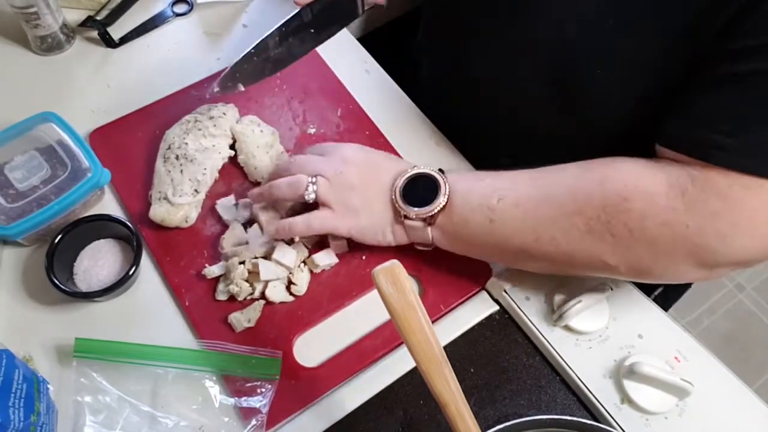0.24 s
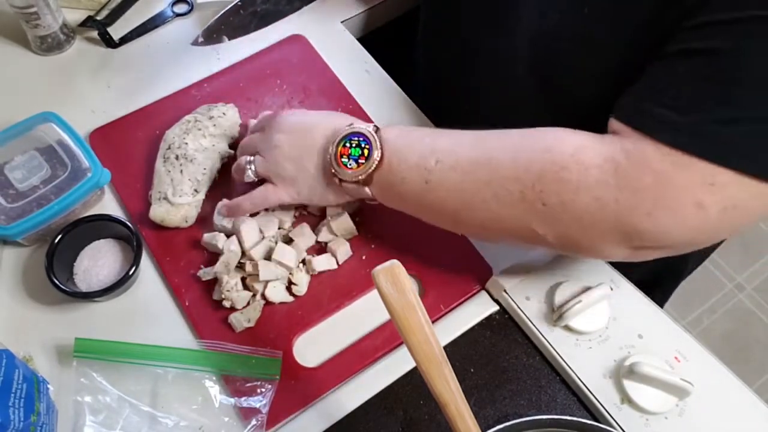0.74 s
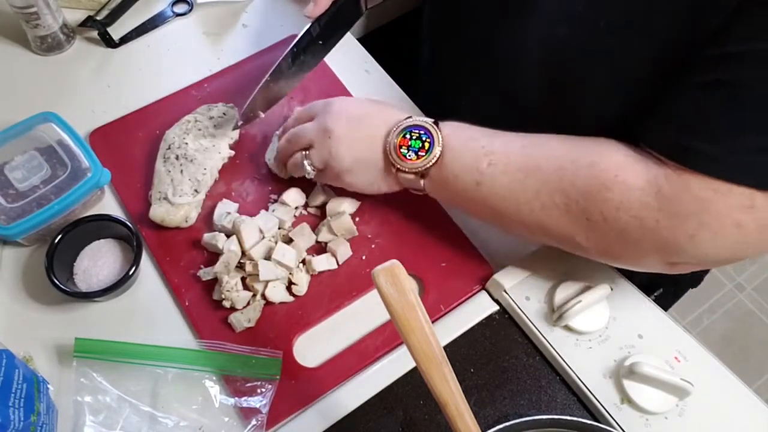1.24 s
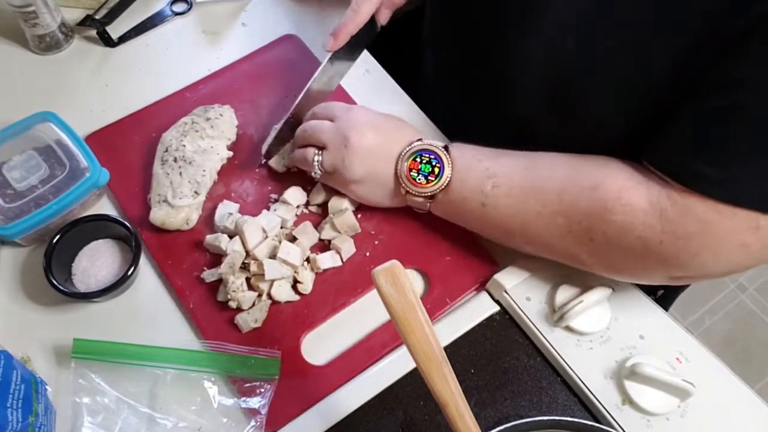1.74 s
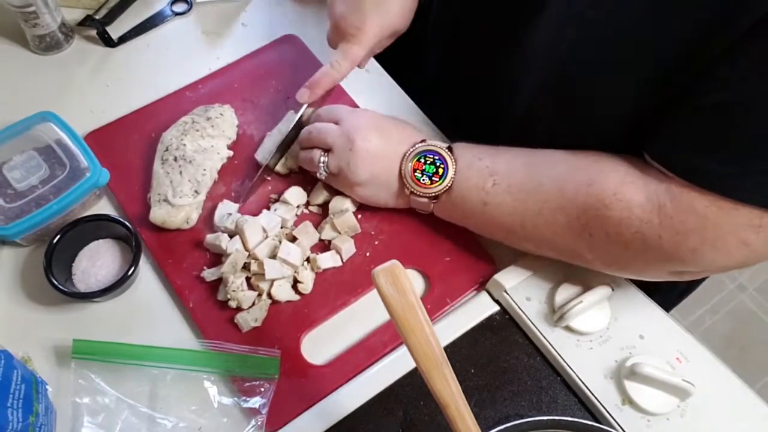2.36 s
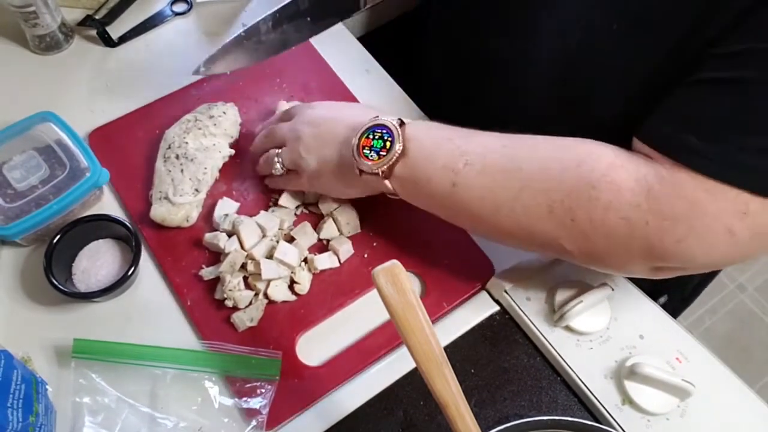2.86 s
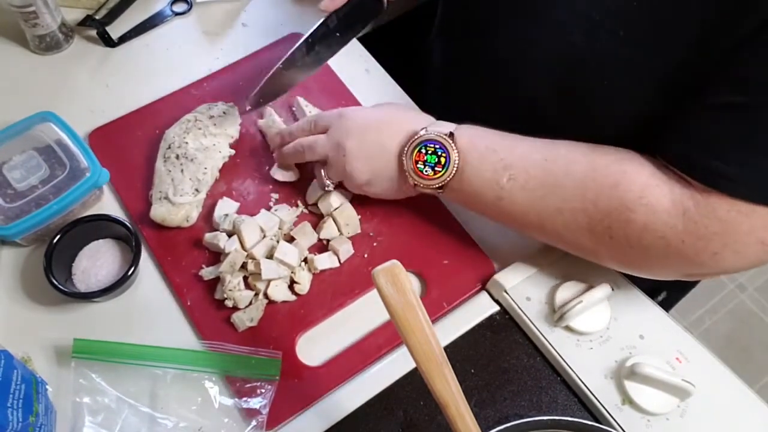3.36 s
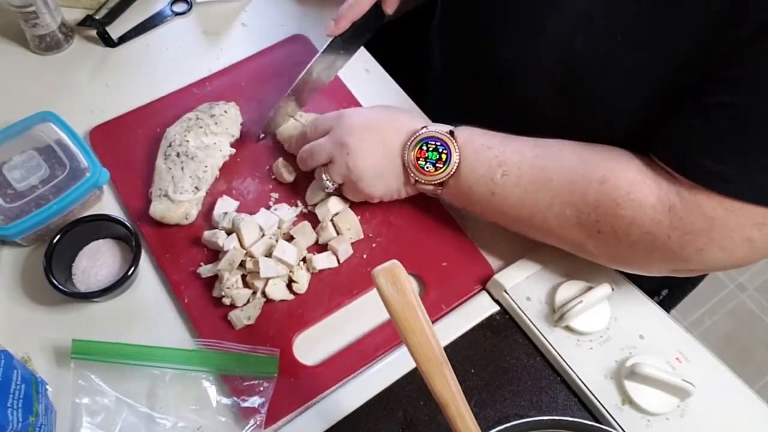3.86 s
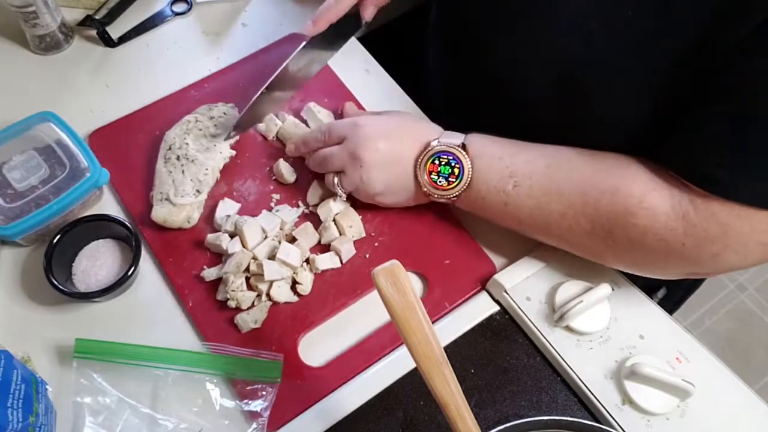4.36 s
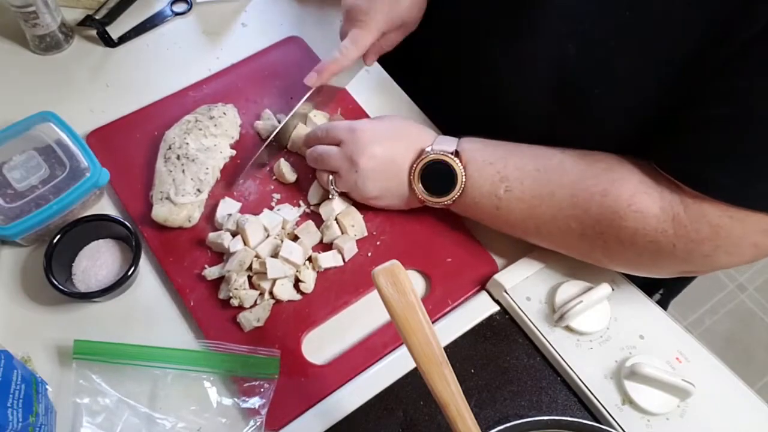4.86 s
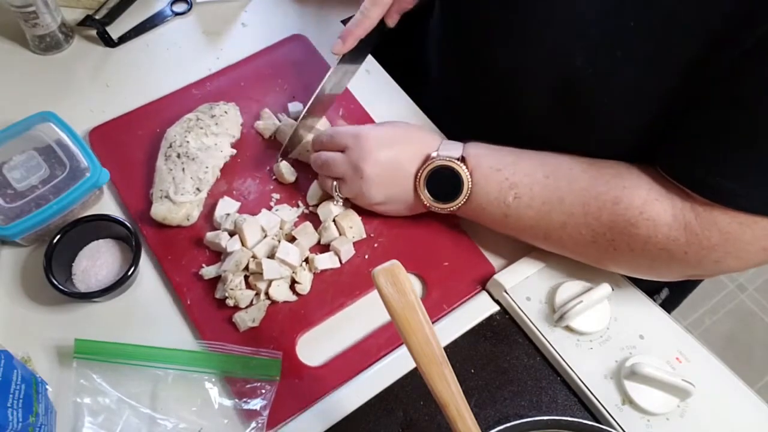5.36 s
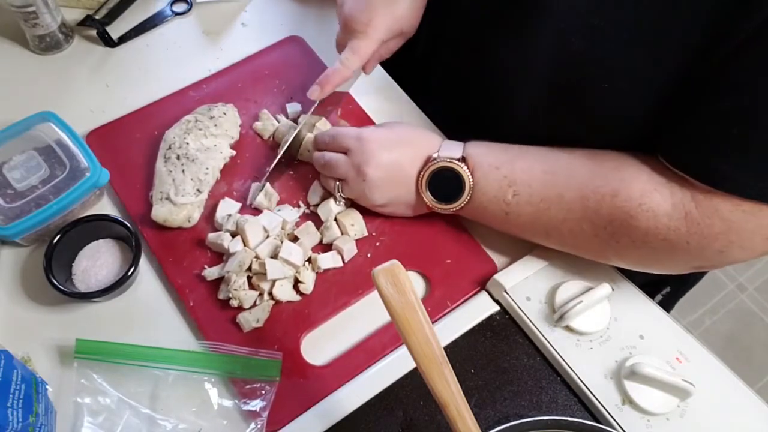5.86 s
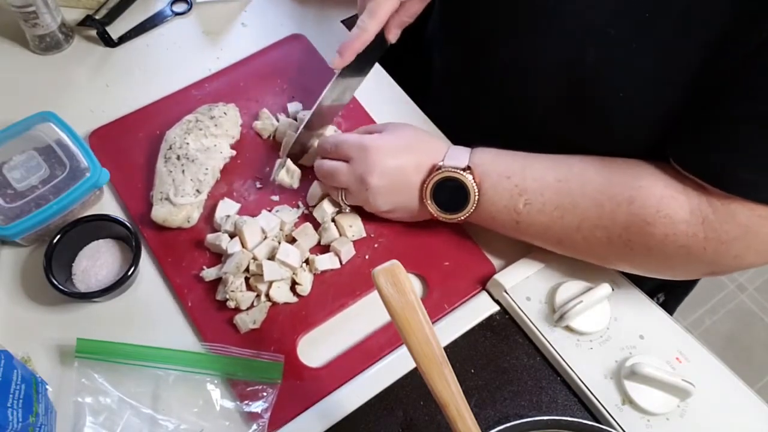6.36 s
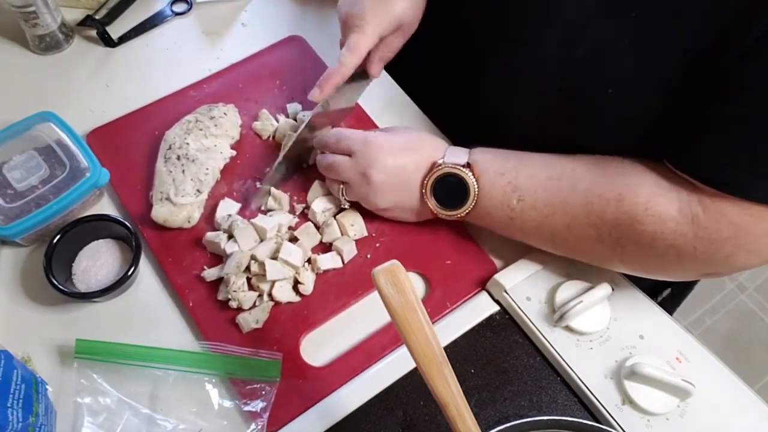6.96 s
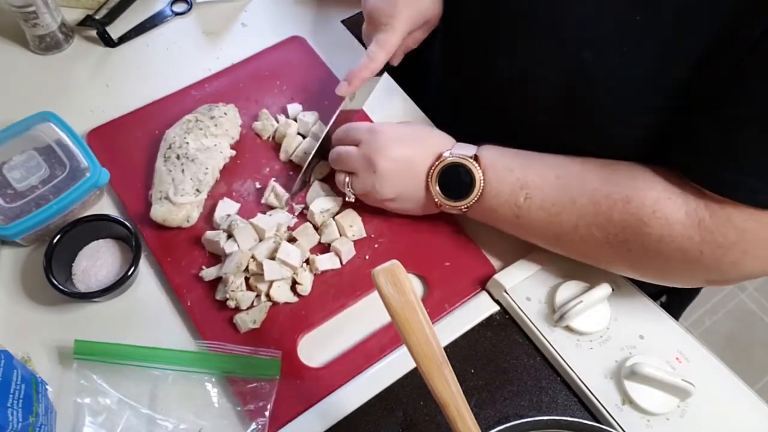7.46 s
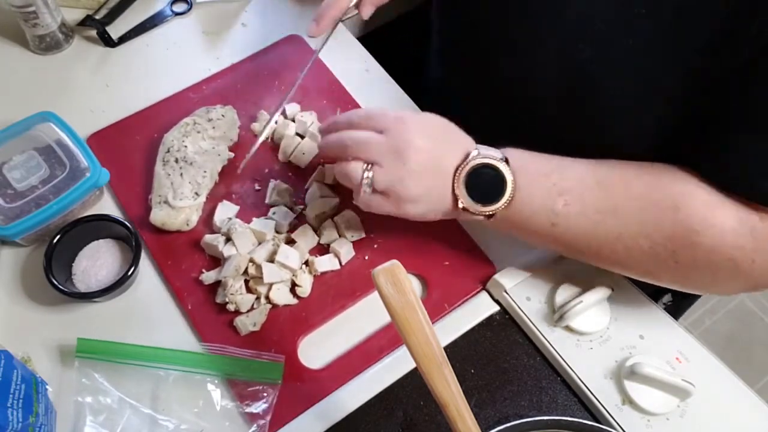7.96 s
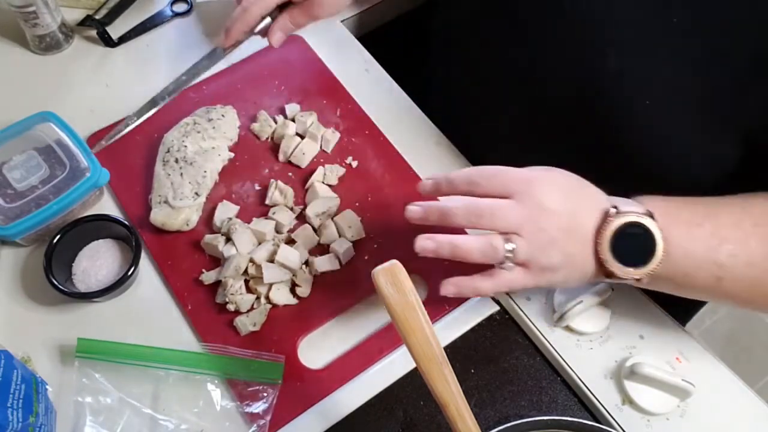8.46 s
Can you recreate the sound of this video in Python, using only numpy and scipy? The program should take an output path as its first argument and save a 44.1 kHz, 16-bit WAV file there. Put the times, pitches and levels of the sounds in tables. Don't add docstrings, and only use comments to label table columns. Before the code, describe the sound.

Close in a small hard kitchen, hands quietly shift moist cooked chicken, then a knife knocks irregularly on a plastic board. Three or four blows are sharp, loud and boomy, others mere dull taps, each with a brief rattle. Soft thuds, wipes and wet ticks fill the gaps. A fridge hums faintly and crickets chirp very softly outside. At the end the knife skids and clanks down. Stereo microphone just above the board.

```python
import sys
import numpy as np
from scipy import signal
from scipy.fft import rfft, irfft
from scipy.io import wavfile
from scipy.ndimage import uniform_filter1d

SR = 44100
rng = np.random.default_rng(int(sys.argv[2]) if len(sys.argv) > 2 else 0)


def materialize(psi):
    bounded = np.clip(np.atleast_2d(psi).T, -1, 1)
    quanta = np.round(bounded * 32767).astype(np.int16)
    wavfile.write(sys.argv[1], SR, quanta)


def ratio(d):
    e = np.asarray(d, float) / 20
    return 10 ** e


N = 384111

# (t/s, clack peak/dB, board boom/dB, edge crack below the clack/dB, clack f/Hz)
CHOPS = [(1.6819, -31.5, -37, -24.5, 1185), (1.8317, -35, -47, -42, 1180), (2.2044, -10, -26, -26, 1316),
         (2.3054, -37.5, -42, -22, 1230), (2.671, -40, -45, -20, 1327), (3.8381, -42.5, -74.5, -6, 1290),
         (3.9643, -5, -21, -6.5, 1300), (4.0116, -18, -29.5, -17, 1400), (4.5861, -35, -45, -33, 1306),
         (4.6932, -10, -27, -19.5, 1350), (4.8568, -28, -50.5, -15.5, 1320),
         (5.4697, -31, -38, -23.5, 1230), (5.6532, -26.5, -36.5, -35, 1170),
         (6.5899, -37.5, -43.5, -19, 1170), (7.381, -13, -27, -39, 948), (7.6067, -40, -55, -30, 1120),
         (7.6697, -48, -51, -19.5, 1113)]
# (clack rise/ms, low rattle below the clack/dB, high rattle/dB, t60/s, face ring/dB)
SETTLING = [(1.27, -17.5, -26.5, 0.32, -26), (1.4, -27, -47, .15, -13), (1, -21.5, -33, 0.25, -15.5),
            (1.5, -22, -28, .1, -24), (1.8, -11, -23, 0.19, -9), (1.2, -24, -23, .15, -13.5),
            (2.7, -24.5, -25, 0.38, -11), (0.85, -21, -17.5, 0.18, -14), (0.64, -17, -30, 0.29, -12),
            (1.2, -27.5, -30.5, 0.35, -12), (0.7, -21, -24, 0.12, -13.5), (1.06, -16.5, -31, 0.34, -19),
            (0.97, -23, -44, 0.25, -15), (2.6, -19.5, -33, 0.18, -10), (1.3, -21, -52, 0.29, -10),
            (1.1, -12.5, -33.5, 0.3, -13.5), (0.72, -21, -32, .15, -12)]
# (f/Hz, level/dB, t60/s)
BOARD = [(296.6, 1.42, 0.085), (360.5, -4.5, 0.065), (252, -10, 0.1107), (481.2, -9, 0.0559)]
# (f/Hz, level/dB, t60/s)
COUNTER = [(135, 0.5, 0.2), (156, -5.5, .1), (111.06, -19.5, 0.12), (59, -14, 0.35)]

OPPOSITE = np.array([[1], [-1]])


def sides(left_db, right_db):
    return ratio(np.array([[left_db], [right_db]]))


def on_log(table, hz, axis=1):
    table = np.array(table, float)
    return np.interp(np.log(np.maximum(hz, 1)), np.log(table[:, 0]), table[:, axis])


def gain_curve(spans):
    out = np.zeros(N)
    for rows in spans:
        s, db = np.array(rows, float).T
        i = np.arange(max(int(s[0] * SR), 0), min(int(s[-1] * SR), N))
        out[i] += ratio(np.interp(i / SR, s, db))
    return uniform_filter1d(out, size=300)


def rub(rows, peak_share=.22):
    end_db, hold_share = -15.5, 0.22
    spans = []
    for s, length, db, *share in rows:
        top = np.clip(share[0] if share else peak_share, .02, .97)
        held = top + hold_share * (1 - top)
        shape = [(0, end_db), (top, 0), (held, -2.5), (1, end_db), (1.3, 2 * end_db)]
        spans.append([(s + length * part, db + step) for part, step in shape])
    return gain_curve(spans)


def band(x, hz, width):
    return signal.lfilter(*signal.iirpeak(min(hz, SR / 2.2), hz / width, fs=SR), x)


def hiss(lo_hz, hi_hz, channels=1, length=N, order=2):
    sos = signal.butter(order, [lo_hz, min(hi_hz, SR / 2.2)], "bandpass", fs=SR, output="sos")
    x = signal.sosfilt(sos, rng.standard_normal((channels, length)))
    return x / np.sqrt(np.mean(x ** 2))


def walk(rate):
    k = int(SR / rate)
    steps = np.repeat(rng.standard_normal(N // k + 1), k)
    return uniform_filter1d(uniform_filter1d(steps, k), k)[:N]


def ring(modes, rise_s, scatter_db=2.5, detune=.018, length=16000):
    t, out = np.arange(length) / SR, 0
    chance = rng.standard_normal((len(modes), 2))
    for (hz, db, t60), (weight, shift) in zip(modes, chance):
        tone = np.sin(2 * np.pi * hz * (1 + detune * shift) * t)
        out = out + ratio(db + scatter_db * weight) * tone * ratio(-60 * t / t60)
    return out * (1 - np.exp(-t / rise_s))


def add(track, sound, s):
    i = int(s * SR)
    track[i:i + len(sound)] += sound[:N - i]


def chops():
    # (f/Hz, width/Hz, level/dB)
    face_modes = [(720, 35, -4.5), (870, 50, 0), (1045, 28, -1.5), (1200, 40, -3), (1382, 40, 0.5),
                  (1586, 50, 0), (1900, 50, 0.5), (2320, 35, 0.5), (2690, 65, 0)]
    out, t = np.zeros(N), np.arange(16000) / SR
    n = len(t)
    for (s, db, board_db, edge_db, hz), (rise_ms, *_, face_db) in zip(CHOPS, SETTLING):
        age = t / (rise_ms / 1000)
        clack = -np.sin(2 * np.pi * hz * t) * age ** 2 * np.exp(1 - age ** 2)
        face = 0
        for k, (f, width, up_db) in enumerate(face_modes):
            face = face + (-1) ** k * ratio(up_db) * band(clack, f, width)
        face = face / np.abs(face).max()

        square_db = edge_db + 21
        slap_db = -17 + 0.34 * square_db
        dull_db = board_db - 2.5 - 0.28 * max(square_db + 5, 0)
        swell = (1 - np.exp(-t / 0.0027)) * np.exp(-t / 0.0073)
        dull = hiss(430, 900, length=n)[0] * swell
        bright = hiss(1000, 2000, length=n)[0] * swell

        crack = hiss(1800, 3500, length=n)[0] + 0.22 * hiss(4000, 7200, length=n)[0]
        crack = crack + .012 * hiss(8000, 15500, length=n)[0]
        crack = crack * (1.1 * np.exp(-t / 0.0013) + 0.1 * np.exp(-t / 0.023))

        counter_db = -43 + 0.51 * (board_db + 40)
        boom = ratio(board_db + 7.5) * ring(BOARD, 0.0029, 3.1)
        boom = boom + ratio(counter_db + 5) * ring(COUNTER, .005, 0.79)
        edge = clack + ratio(face_db) * face + ratio(slap_db) * bright + ratio(edge_db) * crack
        add(out, ratio(db + 1.0) * edge + ratio(dull_db + 6.5) * dull + boom, s + 0.001)
    return out


def settling():
    # (f/Hz, width/Hz, level/dB)
    rattle_peaks = [(2070, 130, 4), (2800, 170, 0), (3240, 100, 0)]
    out, t = np.zeros((N, 2)), np.arange(16000) / SR
    n = len(t)
    for (s, db, *_), (_, low_db, high_db, t60, _) in zip(CHOPS, SETTLING):
        uneven = ratio(4.5 * walk(140)[:n] - 60 * t / t60) * (1 - np.exp(-t / .003))
        low = hiss(480, 1250, channels=2, length=n)
        high = hiss(1600, 2700, channels=2, length=n)
        top = hiss(4100, 6100, channels=2, length=n)
        flexing = sum(ratio(up_db) * band(high, hz, width) for hz, width, up_db in rattle_peaks)
        high = 0.51 * high + flexing + ratio(-16.5) * top
        rattle = ratio(low_db) * low + ratio(high_db) * high
        add(out, (ratio(db) * uneven * rattle).T, s + .002)
    return out.T * sides(1.8, -1.8)


def flexes():
    # (t/s, level/dB, f/Hz, t60/s)
    bends = [(1.684, -45.5, 740, 0.094), (1.686, -38, 400, 0.066), (2.1, -51.5, 400, .05),
             (1.69, -41, 190, .1), (4.696, -36, 495, 0.066), (7.384, -33, 520, 0.097), (6.1, -50, 417, .05),
             (2.42, -48.5, 57, 0.46), (5.47, -49, 170, .12), (6.591, -29, 200, .11),
             (6.71, -48, 170, 0.091), (7.384, -30, 187, 0.077), (7.7, -47, 56, .5), (7.741, -55, 56, .3),
             (8.56, -43.5, 61.7, 0.67)]
    out, t = np.zeros(N), np.arange(16000) / SR
    for s, db, hz, t60 in bends:
        rise = 1 - np.exp(-t * hz * 0.76)
        add(out, ratio(db - 60 * t / t60) * np.sin(2 * np.pi * hz * t) * rise, s)
    return out


def blade_ringing():
    # (f/Hz, level/dB, t60/s)
    blade = [(5330, -13, .08), (6290, 0, .13), (7420, -2, .07), (11800, -6, .06), (13000, -9, .07),
             (14350, -4, .04)]
    # (t/s, level/dB)
    taps = [
        (2.648, -59),
        (2.657, -58),
        (2.668, -53),
    ]
    # (start/s, length/s, level/dB)
    squeaks = [
        (2.954, .04, -74),
        (3.384, 0.061, -73),
    ]
    out, t = np.zeros(N), np.arange(N) / SR
    held = [(f, d, min(t60, .1)) for f, d, t60 in blade]
    for s, db in taps:
        add(out, ratio(db) * ring(held, 0.0046, scatter_db=-3.0, detune=0.00079), s)
    add(out, ratio(-57) * ring([(6430, 0, .02)], 0.0016, detune=.001), 2.787)
    for s, length, db in squeaks:
        swell = np.exp(-((t - s - length / 2) / (length / 2)) ** 2)
        out += ratio(db) * np.sin(2 * np.pi * 14250 * t) * swell
    return out


def laying_down():
    # (f/Hz, level/dB, t60/s)
    knife_modes = [(358, -15.5, 0.14), (599, -18.5, 0.085), (851, -11, .3), (953, -14.5, 0.17),
                   (1412, -12, 0.13), (1637, 4.5, 0.079), (1700, -2.5, 0.079), (2140, -13.5, 0.13),
                   (2250, -13, 0.071), (2806, -10, 0.048), (3620, -16, 0.054), (4650, -29, 0.09)]
    # (start/s, length/s, level/dB, share before the peak)
    slide = [
        (8.522, 0.057, -63, 0.12),
        (8.566, 0.053, -59, 0.36),
    ]
    land_s, land_db = 8.6195, -29.5
    out = np.zeros(N)
    steel = [(f, d, min(t60, .25)) for f, d, t60 in knife_modes]
    # (lag/s, level/dB)
    for lag_s, db in [(-.001, 1), (.007, -17), (.017, -18), (.03, -23), (.052, -21)]:
        add(out, ratio(land_db + db) * ring(steel, 0.0031, scatter_db=2.0, detune=0.011), land_s + lag_s)
    grit = rng.standard_normal(N) * ratio(3.9 * walk(150))
    skid = sum(band(grit, f, 130) for f, _, _ in knife_modes if 1600 < f < 3000)
    out += skid / np.std(skid) * rub(slide)
    t = np.arange(4000) / SR
    add(out, ratio(land_db - 14.0) * hiss(620, 1950, length=4000)[0] * np.exp(-t / 0.029), land_s)
    return out


def thuds():
    # (t/s, peak/dB, board boom/dB, mids/dB)
    pushes = [(0.2, -53.5, -65, -75), (.756, -58, -58, -75), (.79, -60, -58, -75), (.83, -62.5, -62, -75),
              (7.277, -62, -60, -62), (2.03, -61, -63, -75), (4.2, -56.5, -60, -75),
              (8.1, -62.5, -66, -77.5), (0.644, -44.5, -50.5, -54), (1.2, -57, -63, -82),
              (1.285, -65, -62, -80), (1.555, -50, -56, -73), (1.723, -46, -56, -70),
              (1.747, -58, -59, -72), (1.85, -50, -65, -72), (2.367, -53, -58, -65), (2.627, -40, -47, -52),
              (2.643, -49, -56, -61), (3.228, -54.5, -58.5, -76.5), (3.337, -57.5, -62, -78),
              (3.527, -57.5, -63.5, -76.5), (3.665, -56, -66, -77.5), (4.483, -56.5, -60, -69),
              (4.505, -51, -57, -69.5), (4.641, -50.5, -52, -72), (4.542, -57, -63, -70),
              (5.166, -47.5, -45, -50.5), (5.218, -46, -43.5, -59.5), (5.25, -38.5, -42.5, -52),
              (5.285, -48, -49.5, -46.5), (5.533, -44, -54.5, -68.5), (5.609, -53, -55, -49),
              (5.63, -54.5, -57.5, -55), (6.029, -59, -55, -71), (6.36, -58, -60.5, -69.5),
              (6.535, -57.5, -53.5, -72), (6.561, -57.5, -47, -64), (6.59, -40.5, -41.5, -64),
              (6.65, -45, -50.5, -50), (6.72, -52, -64, -66), (6.872, -62.5, -59, -63.5),
              (7.331, -56, -47, -75.5), (7.385, -31.5, -60.5, -71), (7.622, -47, -41, -64.5),
              (7.667, -40, -51.5, -61.5), (7.7, -49.5, -58, -72), (8.574, -57, -58, -69),
              (8.585, -47.5, -63, -65), (8.62, -49, -56, -70)]
    out, t = np.zeros(N), np.arange(16000) / SR
    for s, db, board_db, mids_db in pushes:
        pat = hiss(1180, 1480, length=len(t), order=3)[0] * np.exp(-t / .008) * np.minimum(t / .002, 1)
        low = ratio(db + 4) * ring(COUNTER, 0.0011) + ratio(board_db + 9.5) * ring(BOARD, 0.017)
        add(out, low + ratio(mids_db - 5.0) * pat, s)
    return out


def strokes():
    # (start/s, length/s, hiss level/dB, fineness/dB)
    wipes = [(0.095, 0.17, -74, -17), (0.365, 0.06, -79, -8), (0.519, 0.11, -75, -2),
             (.69, 0.24, -79.5, -28.5), (1.502, 0.083, -74, 3.5), (2.055, 0.18, -80, -3),
             (2.176, 0.15, -56.5, -0.5), (2.375, 0.23, -77, 2), (2.616, 0.13, -72, 0),
             (2.945, 0.23, -67, -5), (3.365, 0.14, -74, -7.5), (3.567, 0.055, -66.5, -10),
             (3.712, 0.069, -78, -16), (3.826, 0.084, -64, 0.5), (3.963, 0.18, -67, -5.5),
             (4.727, 0.13, -60, -8), (5.611, 0.2, -67, -2), (6.562, 0.19, -67.5, -3),
             (5.85, .15, -79.5, -8), (6.134, 0.11, -83.5, -10), (6.86, 0.078, -77.5, 3.5),
             (7.091, 0.12, -65, -20), (7.36, 0.11, -65, -7.5), (8.377, .1, -82.5, 8),
             (8.53, 0.25, -72.5, -11.5)]
    rest_db = -84
    slips = rng.random(N) < 60 / SR
    grain = ratio(2 * walk(40) + 2.5 * walk(150)) + 1.2 * signal.lfilter([1], [1, -.985], slips)

    def layer(db, per_db):
        return rub([(s, length, level + db + per_db * fineness) for s, length, level, fineness in wipes])

    fine = hiss(8900, 18000, channels=2) * (layer(0, 1) + ratio(rest_db + 1.5)) * sides(1.5, 3.5)
    middle_gain = layer(0, 0) + ratio(rest_db - 2.5 + 4.3 * walk(4.9))
    middle = hiss(3800, 8660, channels=2) * middle_gain * ratio(3.5)
    coarse = hiss(2200, 3400, channels=2) * (layer(-12.5, -.5) + ratio(rest_db)) * ratio(-3.5)
    return (fine + middle + coarse) * grain


def scuffs():
    # (start/s, length/s, low scuff/dB, brightness/dB, share of length before the peak)
    rubs = [(2.176, 0.033, -50, -25, 0.86), (2.33, 0.38, -68.5, -23, 0.11), (3.898, 0.064, -68.5, -19, .9),
            (4.665, 0.057, -55, -26, 0.96), (2.963, 0.27, -71.5, -7, 0.18), (5.15, 0.15, -64.5, -10.5, .15),
            (5.588, 0.1, -59, -21.5, 0.67), (5.683, 0.25, -63.5, -12.5, 0.33),
            (6.523, 0.078, -61.5, -17, 0.79), (6.588, 0.17, -56, -9, 0.31), (7.091, 0.19, -59, -9.5, 0.25),
            (7.348, 0.036, -54, -27, 0.94), (7.601, 0.12, -63, -15.5, 0.086), (8.516, 0.062, -70, -5, .3),
            (8.565, 0.074, -57, -14, 1)]
    low_gain = rub([(s, n, db, top) for s, n, db, _, top in rubs])
    bright_gain = rub([(s, n, db + up, top) for s, n, db, up, top in rubs])
    low = hiss(550, 1750, channels=2, order=3) * low_gain * ratio(4 * walk(80))
    bright = hiss(1900, 4200, channels=2, order=3) * bright_gain * ratio(4 * walk(120))
    return (low + bright) * sides(1.5, -1.5)


def dragged_heap():
    # (f/Hz, width/Hz, level/dB)
    hollows = [(1180, 120, 5.5), (1370, 130, 11.5), (1560, 140, 8), (2500, 240, -4.5), (2900, 350, -3),
               (5380, 710, -10)]
    noise = rng.standard_normal(N)
    drag = sum(ratio(db) * band(band(noise, f, w), f, w) for f, w, db in hollows)
    gain = rub([(0.6705, 0.18, -53.5)], 0.3)
    return drag / np.std(drag) * gain * ratio(2.6 * walk(91.2)) * sides(2.5, -.5)


def ticks():
    # (t/s, peak/dB, f/Hz)
    clicks = [(0.129, -70, 4630), (0.24, -57, 4240), (0.2992, -56, 3950), (0.373, -57, 7400),
              (0.497, -57.5, 6700), (0.5494, -66, 7400), (1.514, -63, 4330), (1.5594, -64, 6900),
              (1.7275, -59, 2800), (2.4084, -63.5, 7500), (2.494, -56, 6300), (2.957, -60, 4200),
              (3.54, -67.5, 3200), (3.63, -64, 2800), (4.999, -66, 2397), (5.068, -60, 7800),
              (6.17, -63, 3100), (7.072, -68.5, 3000), (3.1225, -59, 3370), (3.153, -57, 7450),
              (3.582, -60, 4680), (3.7075, -61.5, 3200), (3.7194, -56.5, 4770), (3.9484, -62, 6780),
              (4.187, -63, 7970), (4.3456, -67, 2730), (4.387, -63, 3116), (4.4695, -62.5, 3760),
              (5.9286, -59.5, 7300), (6.4988, -59.5, 4300), (6.8728, -59.5, 6490), (7.862, -62, 4450),
              (8.023, -59, 9500), (8.54, -54.5, 6730)]
    out, t = np.zeros(N), np.arange(400) / SR
    for s, db, hz in clicks:
        pop = np.sin(2 * np.pi * hz * t) * t / 0.00014 * np.exp(1 - t / 0.00038)
        snap = hiss(2500, 15000, length=len(t))[0] * np.exp(-t / .0005)
        add(out, ratio(db - 1.0) * (pop + 0.4 * snap), s)
    return out


def leaning():
    # (t/s, effort/dB)
    effort = [(0, -63), (.3, -61), (.63, -61), (1.57, -75.5), (1.75, -51.5), (2.1, -68), (2.421, -59),
              (3.0, -70.5), (4.1, -60.5), (4.35, -66.5), (4.75, -59), (5.04, -67.5), (5.6, -58.5),
              (6.2, -73.5), (6.65, -62), (7.15, -65), (7.65, -60.5), (7.92, -72.5), (8.4, -76.5),
              (8.6, -61)]
    extra_db = np.interp(np.arange(N) / SR, *np.array(effort).T) + 66
    deep = hiss(40, 70)[0] * ratio(-70.5 + 1.02 * extra_db)
    low = hiss(110, 350, order=3)[0]
    body = band(low, 135, 35) + band(low, 280, 60)
    low = (.4 * low + ratio(4) * body) * ratio(-67.5 + 0.79 * extra_db)
    rustle = hiss(600, 1550, order=3)[0] * ratio(-75.5 + 0.75 * extra_db)
    out = ratio(1.3 * walk(11.0)) * deep
    out = out + ratio(-2.5 + 3.5 * walk(22)) * low
    return out + ratio(-3.0 + 1.5 * walk(23)) * rustle


def cricket(chirps, hz, spread_hz, rasp_db):
    syllable_s, syllable_db, sag_hz_per_s = .037, 2.5, 390
    shape = [(-.09, -18), (.12, -3.5), (.5, 1), (.85, 0), (1.1, -11.5), (1.5, -19)]  # (share of length, dB)
    gain = gain_curve([[(s + part * length, db + step) for part, step in shape] for s, length, db in chirps])
    t, starts = np.arange(N) / SR, np.array(chirps)[:, 0]
    latest = np.clip(np.searchsorted(starts, t + .06) - 1, 0, None)
    age = np.clip(t - starts[latest], -.1, .4)
    stroke = age / syllable_s % 1
    beat = ratio(syllable_db * (.5 - stroke)) * np.minimum(stroke / .08, 1)
    pitch = hz - 60 * stroke - sag_hz_per_s * age + 35 * walk(70)
    tone = np.sin(2 * np.pi * np.cumsum(pitch) / SR) * ratio(4.0 * walk(150) - .3) * beat
    rasp = hiss(hz - spread_hz, hz - 40, channels=2, order=3)
    return (tone + ratio(rasp_db + 3.8 * walk(90)) * rasp) * gain


def crickets():
    # (start/s, length/s, level/dB)
    near_chirps = [(.11, 0.16, -69), (.78, 0.17, -67.5), (1.37, 0.17, -70), (2.13, 0.2, -70),
                   (2.80, 0.18, -70), (3.52, 0.16, -70.5), (4.49, 0.18, -70.5), (5.08, 0.15, -67.5),
                   (5.68, 0.18, -68.5), (6.33, .17, -71), (7.02, 0.19, -70), (7.69, 0.15, -69.5),
                   (8.27, .17, -70)]
    # (start/s, length/s, level/dB)
    far_chirps = [
        (0, .11, -82.5),
        (.45, 0.17, -81),
        (2.95, .1, -75),
        (3.41, 0.1, -80.5),
    ]
    both = cricket(near_chirps, 4720, 430, -1.5) + cricket(far_chirps, 5520, 140, 1.0)
    return both * sides(1.5, -1.5)


def kitchen_air():
    # (f/Hz, level per Hz/dB)
    air = [(15, -39), (25, -10.5), (53, 0), (88, -9.5), (135, -4.5), (270, -5.5), (503, -17), (1070, -18.5),
           (1190, -24), (1790, -35.5), (4490, -35), (5880, -42.5), (7310, -22.5), (9070, -45.5),
           (14800, -30.5), (16000, -38.5)]
    # (f/Hz, level/dB)
    hum = [(134.6, -78), (269.2, -73.5), (705.2, -86.5), (1087, -84.5), (1357, -89.5)]
    t, hz = np.arange(N) / SR, np.fft.rfftfreq(N, 1 / SR)
    colour = ratio(on_log(air, hz))
    mid, side = (irfft(rfft(rng.standard_normal(N)) * colour, N) for _ in range(2))
    side = irfft(rfft(side) * np.clip(hz / 900, .2, 1), N)
    out = (mid + side * OPPOSITE) / np.std(mid) * ratio(-68 + 1.5)
    for f, db in hum:
        out = out + ratio(db + 4.0 + 3.0 * walk(14.0)) * np.sin(2 * np.pi * f * t)
    out = out + ratio(-91.5) * hiss(1400, 1420)
    out = out + ratio(np.interp(t, [0.05, .5, .9], [-68, -66, -90])) * hiss(68, 98)
    return out * sides(1.1, -1.1)


def room(x):
    # (f/Hz, t60/s, level/dB)
    decay = [(100, 0.39, -16.5), (301, 0.19, -14), (670, .34, -10.5), (1350, 0.24, -22.5),
             (2100, 0.31, -15.5), (3460, 0.33, -13.5), (6540, 0.31, -13.5), (8970, 0.37, -20.5)]
    t, tail = np.arange(22000) / SR, 0
    for hz in 60 * 2 ** np.arange(0, 8, .5):
        mid, side = hiss(hz / 1.19, hz * 1.19, channels=2, length=len(t))
        pair = mid + np.clip(hz / 500, 0, 1) * side * OPPOSITE
        t60 = on_log(decay, hz)
        fall = ratio(on_log(decay, hz, axis=2) + 9.0 - 60 * t / t60)
        tail = tail + pair * np.sqrt(hz / SR / t60 / SR * 10) * fall
    tail = tail * (1 - np.exp(-(t / 0.0053) ** 2))
    return signal.fftconvolve(x[None], tail, axes=1)[:, :N]


def at_ports(x):
    # (f/Hz, left minus right/dB)
    board_pan = [(60, 3.5), (150, 4), (300, -1), (700, 4), (1400, 5), (5000, 5), (10000, 1), (15000, -2.5)]
    lag_s, lag_fades_hz = 9e-5, 6000
    hz = np.fft.rfftfreq(N, 1 / SR)
    pan = ratio(on_log(board_pan, hz) / 2 * OPPOSITE)
    lag = lag_s / (1 + (hz / lag_fades_hz) ** 2) * np.array([[1], [0]])
    return irfft(rfft(x) * pan * np.exp(-2j * np.pi * hz * lag), N)


def scene():
    steel = blade_ringing() + laying_down()
    near = chops() + thuds() + ticks() + flexes() + steel
    direct = at_ports(near + leaning()) + ratio(-14) * steel * OPPOSITE
    friction = strokes() + scuffs() + dragged_heap()
    return direct + room(near) + settling() + friction + crickets() + kitchen_air()


def gain_control(x):
    above_db, duck_db = -3.5, -4.5
    slew_s, hold_s, recover_s = 0.5, 2.336, 0.22
    loud = np.flatnonzero(np.abs(x).max(axis=0) > ratio(above_db))
    t, duck = np.arange(N) / SR, np.zeros(N)
    for s in loud[np.diff(loud, prepend=-SR) > SR // 10] / SR:
        dip = np.interp(t - s, [0, slew_s, hold_s, hold_s + recover_s], [0, 1, 1, 0])
        duck = np.maximum(duck, dip)
    return x * ratio(duck_db * duck)


def band_limit(x):
    return signal.sosfilt(signal.butter(12, 16740, fs=SR, output="sos"), x)


def record(dry):
    heard = signal.sosfilt(signal.butter(3, 46, "highpass", fs=SR, output="sos"), dry)
    heard = gain_control(heard)
    heard = heard - 0.39 * band(heard, 8200, 3000)
    heard = signal.sosfilt(signal.ellip(10, .3, 60, 15680, fs=SR, output="sos"), heard)
    return band_limit(np.clip(heard, -1, 1))


dry = scene()
out = record(dry)
materialize(out)
```